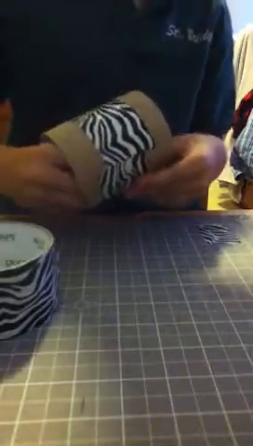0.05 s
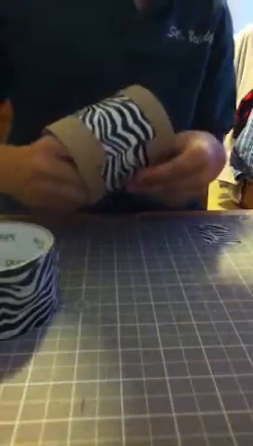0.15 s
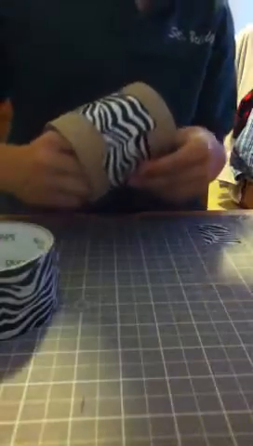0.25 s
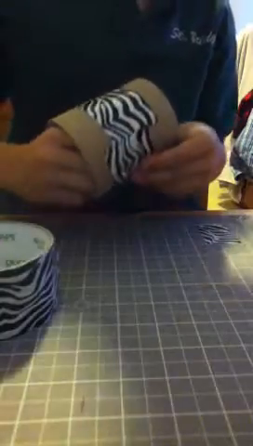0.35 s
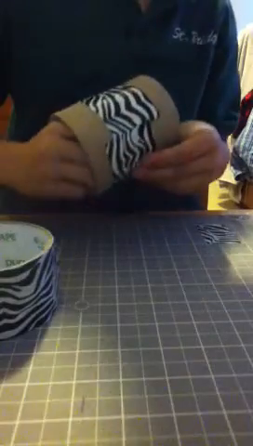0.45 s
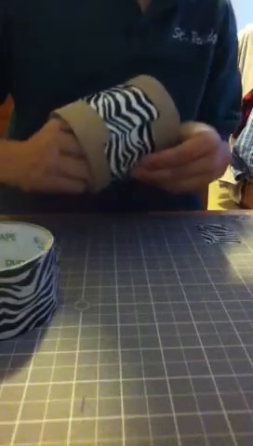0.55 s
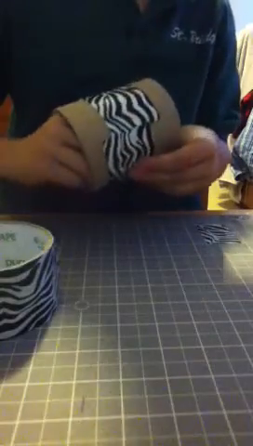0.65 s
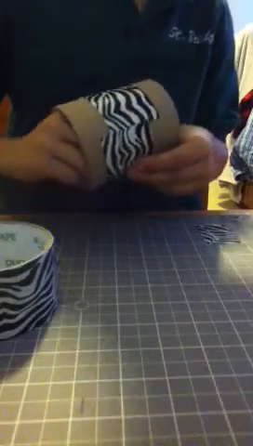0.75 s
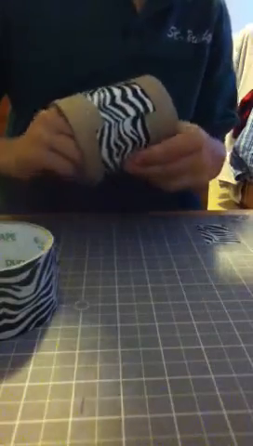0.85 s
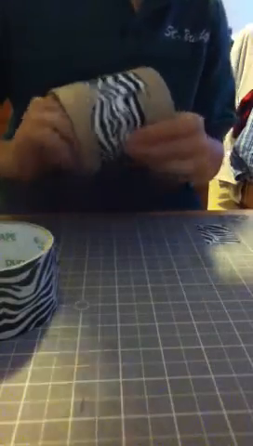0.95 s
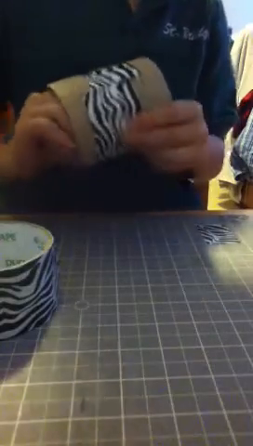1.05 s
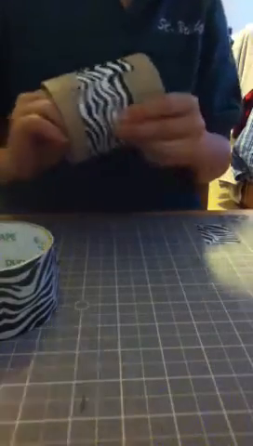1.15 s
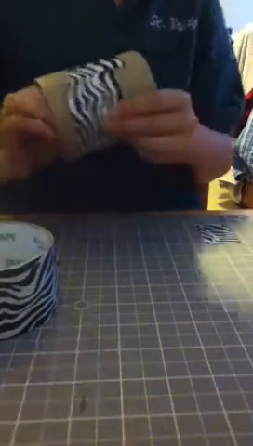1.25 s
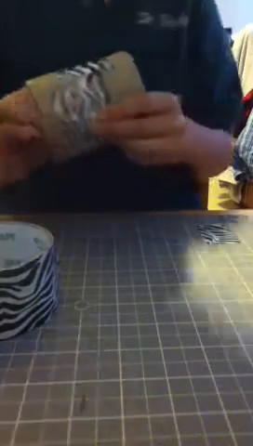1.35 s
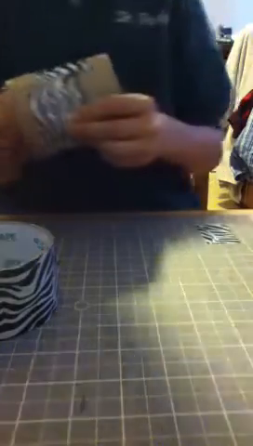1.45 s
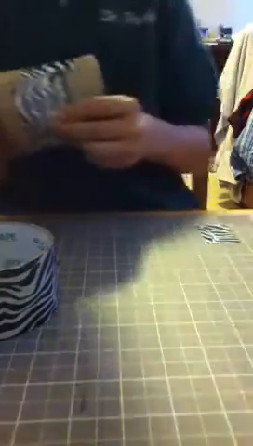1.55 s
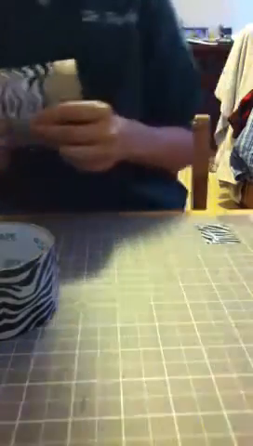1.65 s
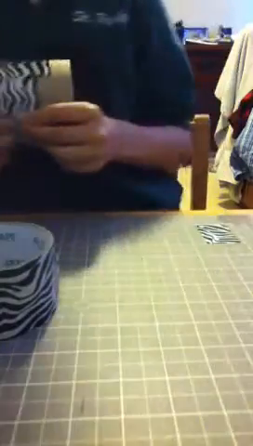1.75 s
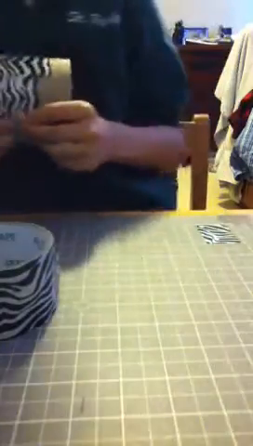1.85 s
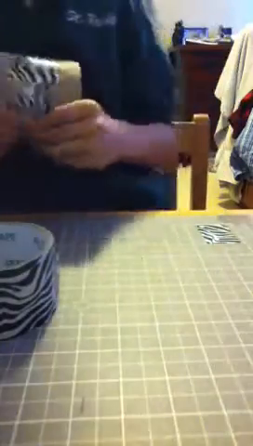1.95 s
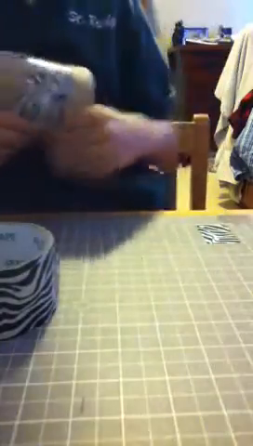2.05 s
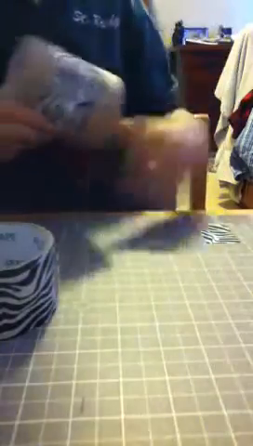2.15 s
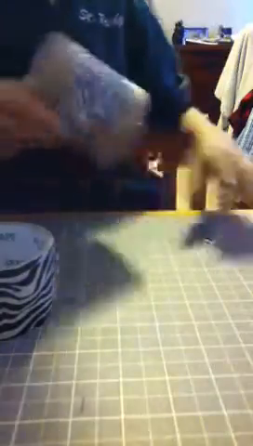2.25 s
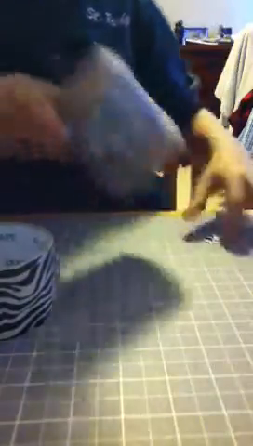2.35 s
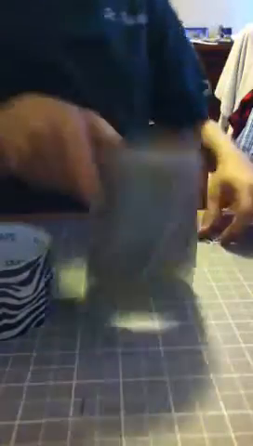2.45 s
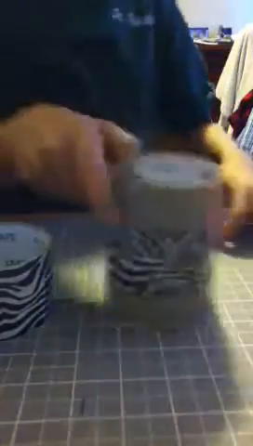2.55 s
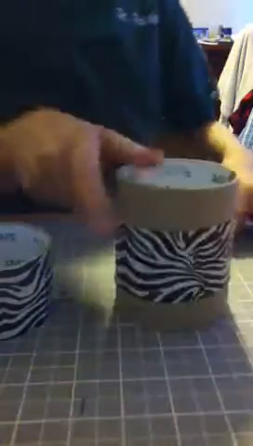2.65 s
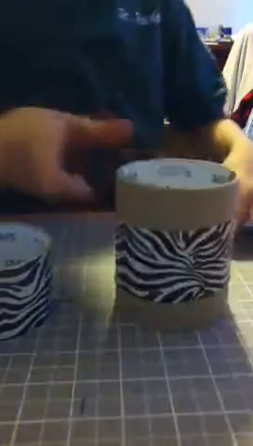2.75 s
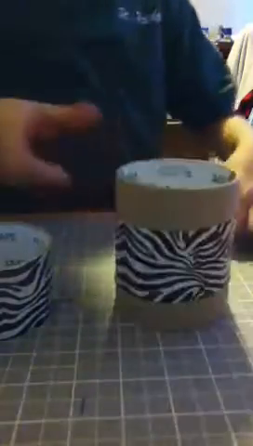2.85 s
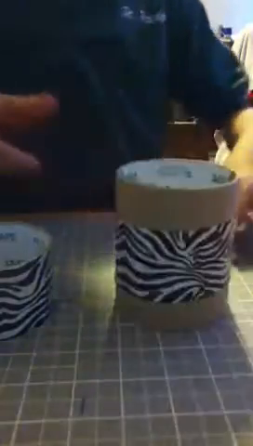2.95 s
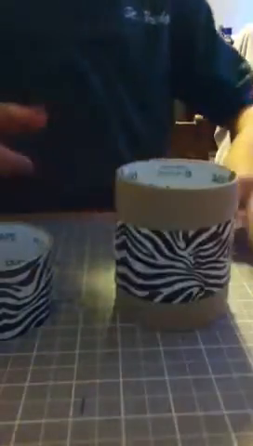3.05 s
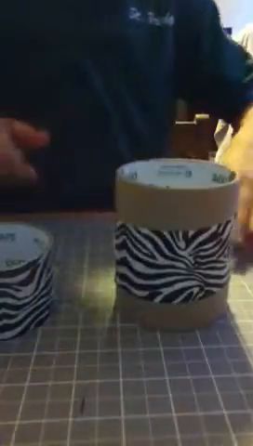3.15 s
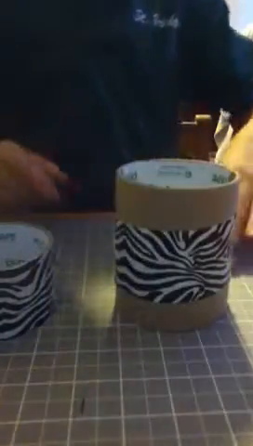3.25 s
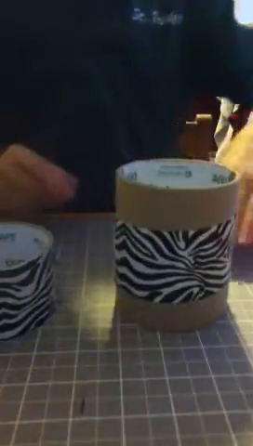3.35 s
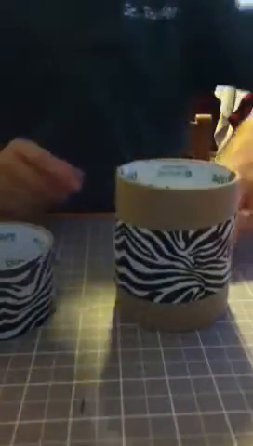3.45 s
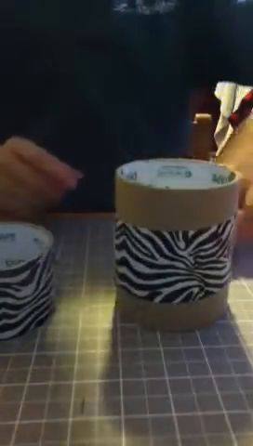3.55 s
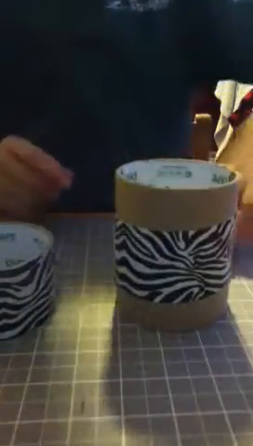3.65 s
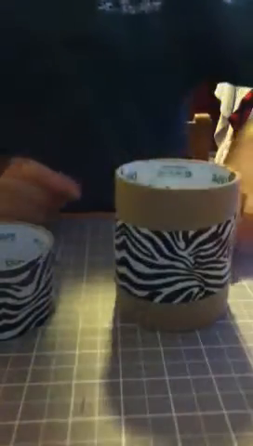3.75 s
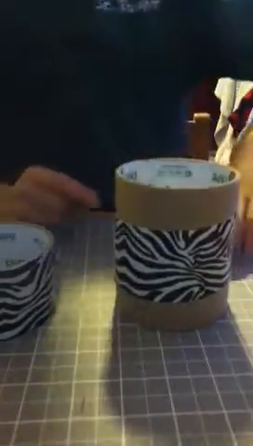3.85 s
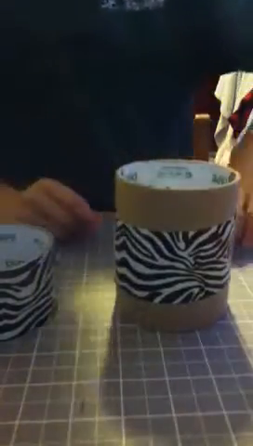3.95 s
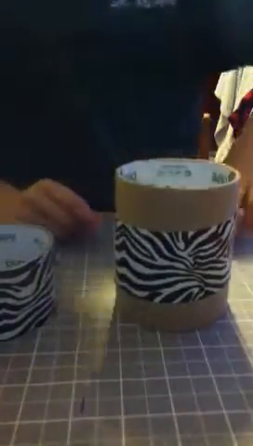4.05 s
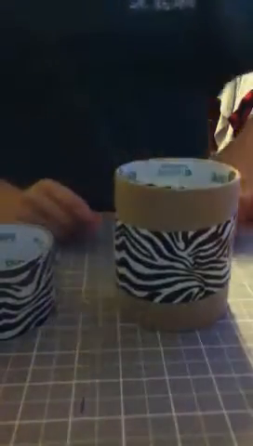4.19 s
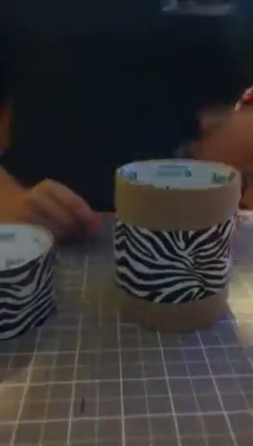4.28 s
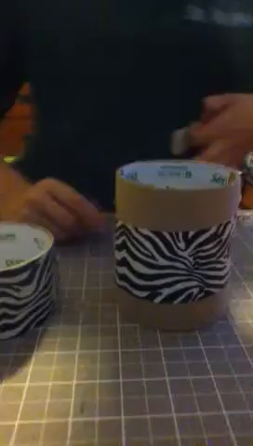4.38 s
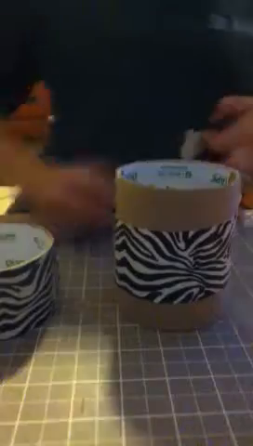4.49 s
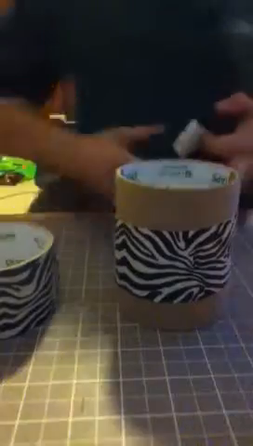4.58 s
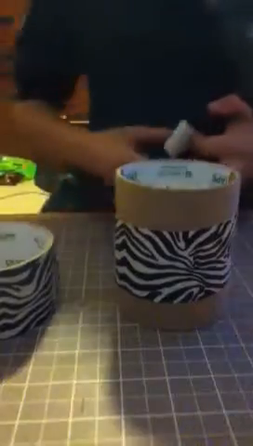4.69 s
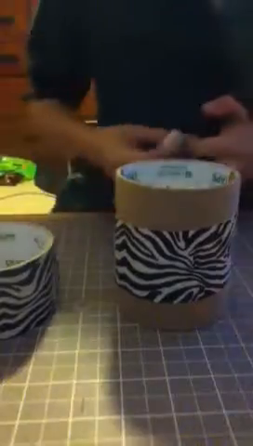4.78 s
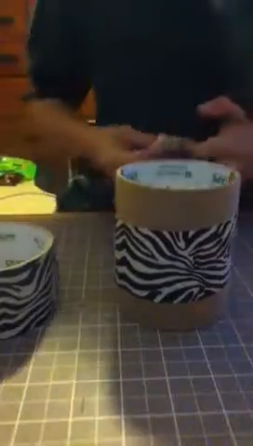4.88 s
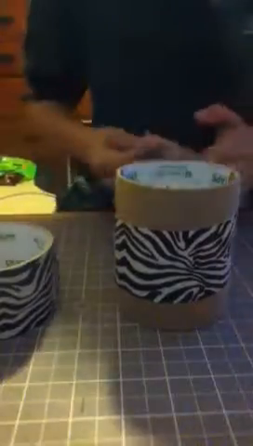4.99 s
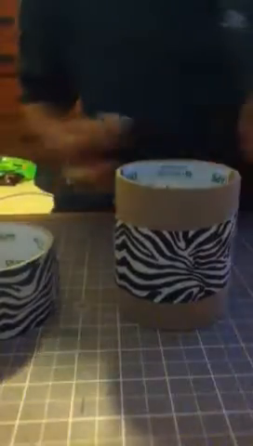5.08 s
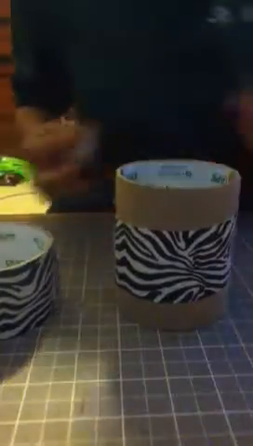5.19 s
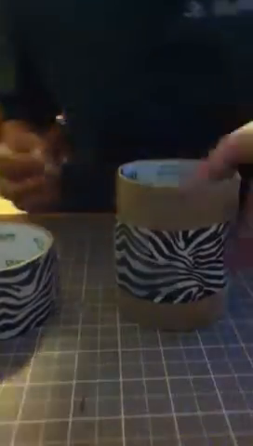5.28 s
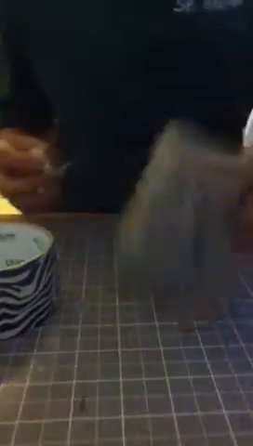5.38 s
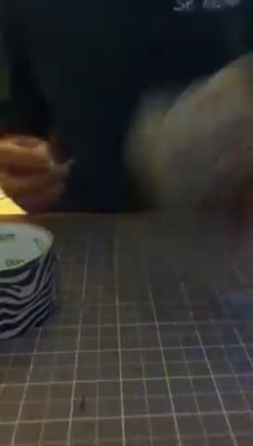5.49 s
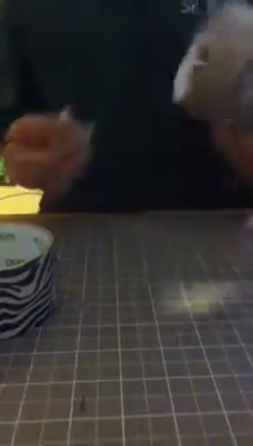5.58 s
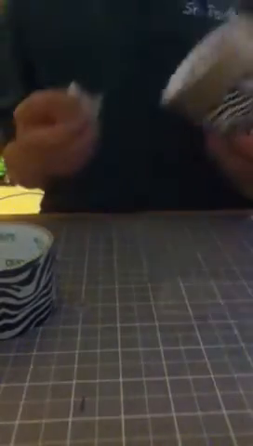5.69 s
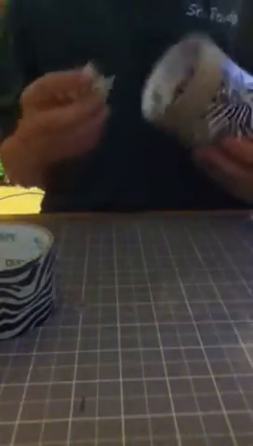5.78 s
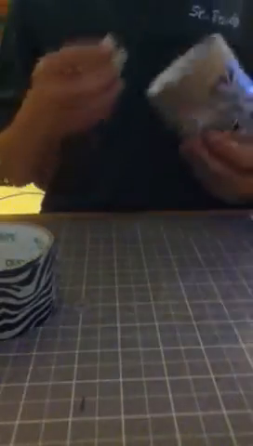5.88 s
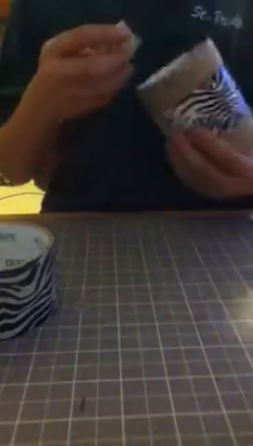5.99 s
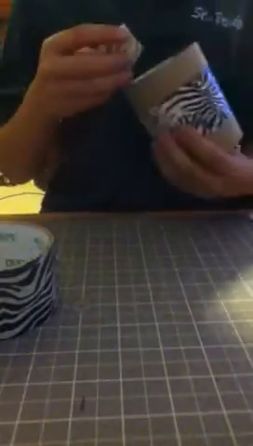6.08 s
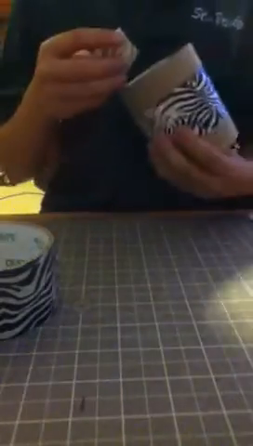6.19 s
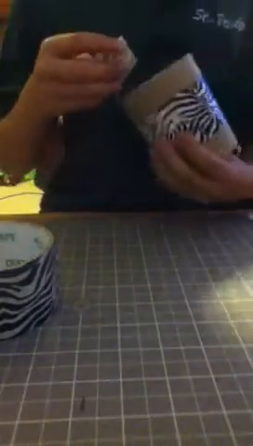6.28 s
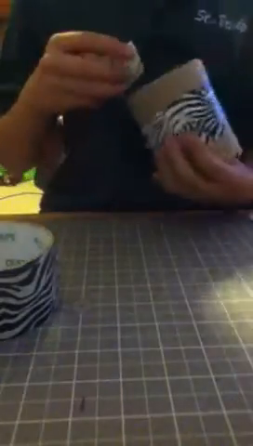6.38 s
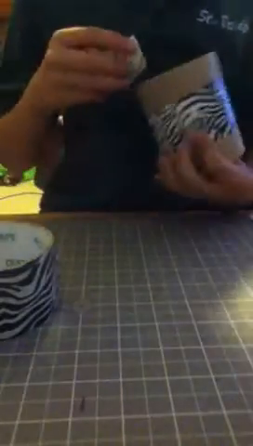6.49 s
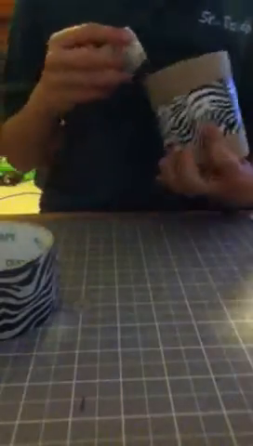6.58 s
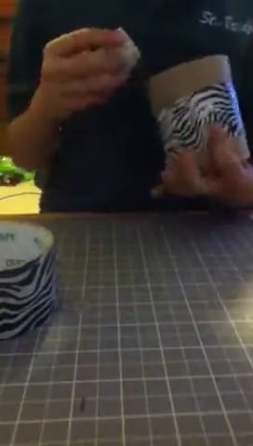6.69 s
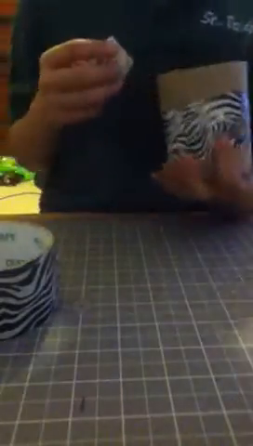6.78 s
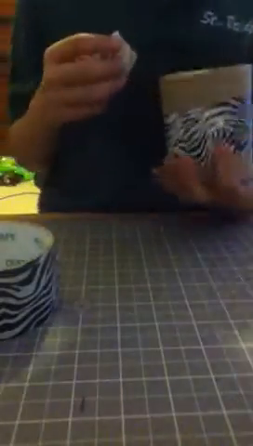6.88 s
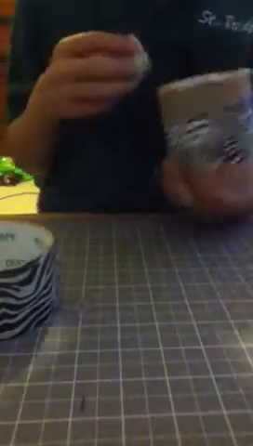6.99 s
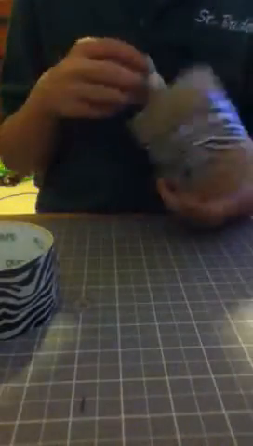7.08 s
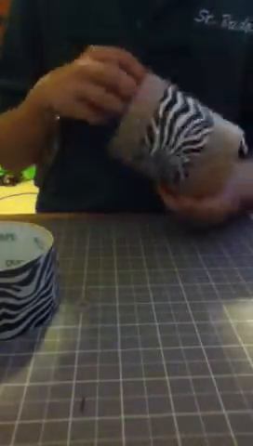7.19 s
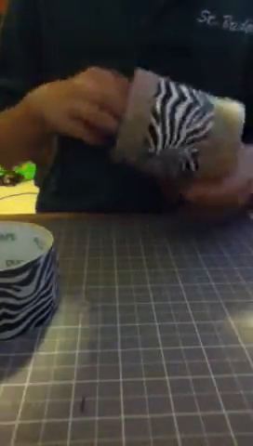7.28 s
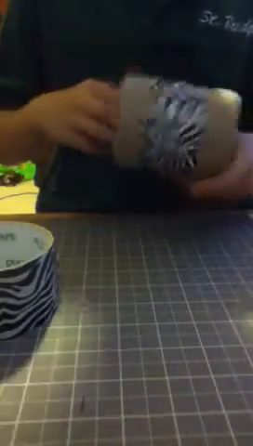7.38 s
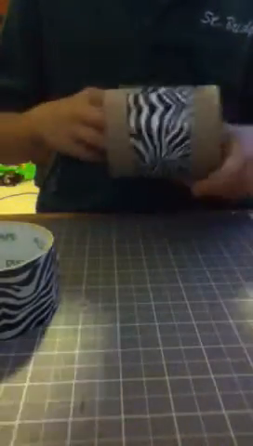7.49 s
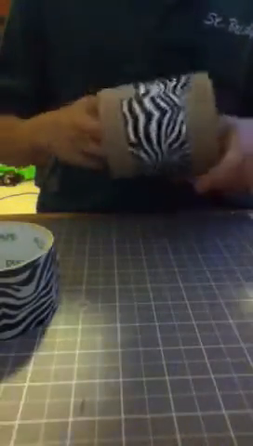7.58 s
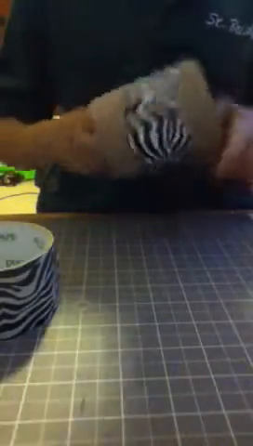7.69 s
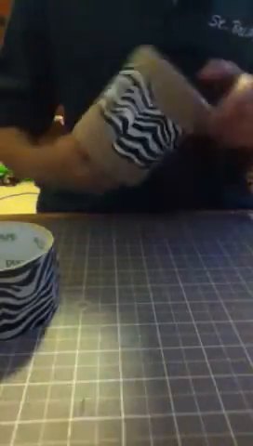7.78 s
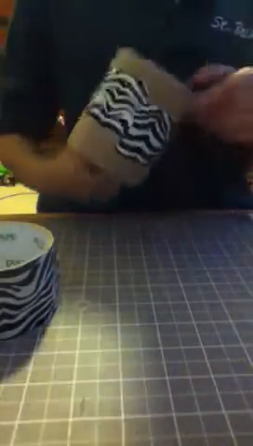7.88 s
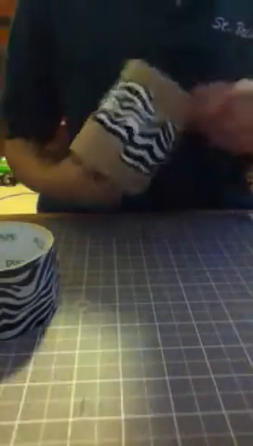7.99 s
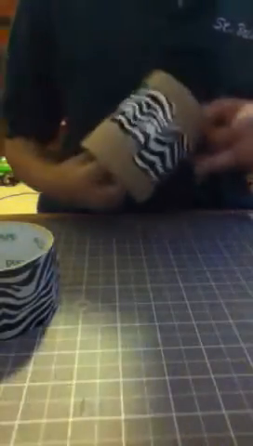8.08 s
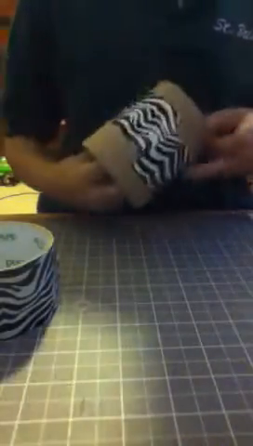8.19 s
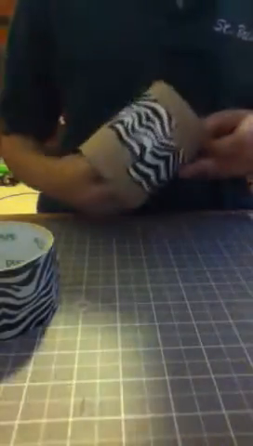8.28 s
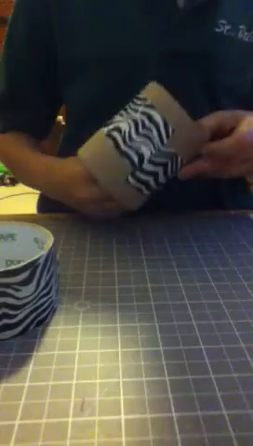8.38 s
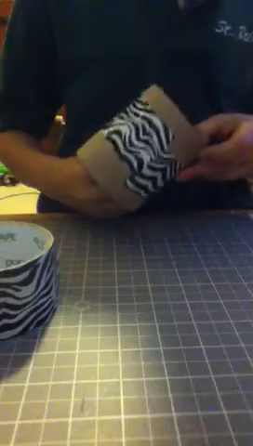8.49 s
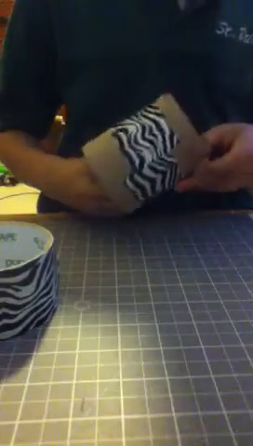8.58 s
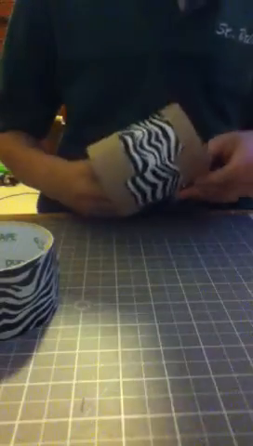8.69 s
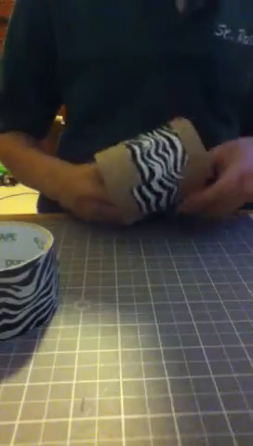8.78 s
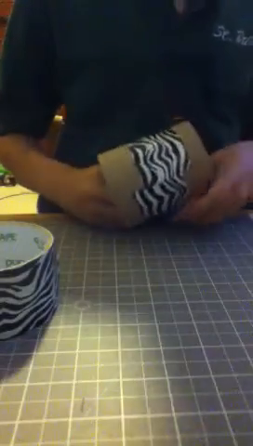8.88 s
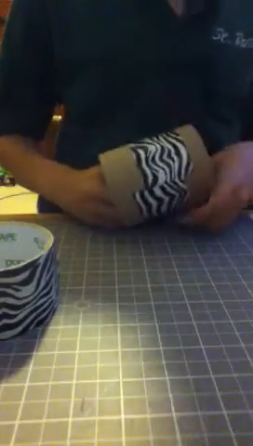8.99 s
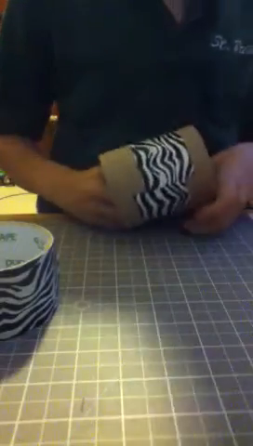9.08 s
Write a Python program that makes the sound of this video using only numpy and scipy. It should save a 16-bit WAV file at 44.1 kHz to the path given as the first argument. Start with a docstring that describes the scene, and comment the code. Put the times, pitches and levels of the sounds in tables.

```python
"""A fan hums in a small room, with a faint electrical whine. Hands turn a cardboard tape core, skin hissing
over the card. At 2.6 s it lands on a cutting mat with a knock that rings core and table, then skids and
rocks to rest. Hands thump the table; just after 4 s a scrap of tape peels off its edge in tiny adhesive
slips and rips free. The core is picked up and rubbed again, with one faint squeak and a few soft bumps."""
import sys
import numpy as np
from scipy import signal
from scipy.fft import rfft, irfft
from scipy.io import wavfile

SR = 44100
rng = np.random.default_rng(int(sys.argv[2]) if len(sys.argv) > 2 else 0)


def transcribe(u):
    """Save the signal u as a 16-bit wav file named by the first command-line argument.

    u: samples, shape (n,) or (channels, n), limited to [-1, 1]; the rate is SR.
    q: integer samples, one column per channel.
    """
    v = np.clip(np.atleast_2d(u).T, -1, 1)
    q = np.round(v * 32767).astype(np.int16)
    wavfile.write(sys.argv[1], SR, q)


N = 403118
TIME = np.arange(N) / SR

# tone colour of the tape: f/Hz, level/dB
TAPE_COLOUR = [(100, 10), (450, 9), (720, 11.5), (1200, 3), (2600, -0.5), (3900, -2), (4600, -4.5),
               (7600, -5.5), (9000, 0), (16000, -6.5)]
# papery resonances of the taut strip: f/Hz, width/Hz, level/dB
STRIP_PEAKS = [(1480, 370, -6), (2100, 130, 4), (3100, 520, 2), (5100, 800, 4), (6520, 370, 2)]
# tone colour of skin pressed on card: f/Hz, level/dB
RASP_COLOUR = [(300, -9.5), (900, 3), (1500, -3), (2300, -2), (3600, -3.5), (5000, -4.5), (8000, -24),
               (16000, -24)]


def amp(db):
    """Decibels to gain."""
    return 10 ** (np.asarray(db) / 20)


def unit(x):
    """Scales to rms 1."""
    return x / np.sqrt(np.mean(x ** 2) + 1e-20)


def read(points, hz):
    """Reads a curve on a log-frequency axis."""
    f, value = np.transpose(points)
    return np.interp(np.log(hz + 1), np.log(f + 1), value)


def add(mix, s, sound):
    """Lays a sound into the mix at time s."""
    part = mix[max(round(s * SR), 0):][:len(sound)]
    part += sound[:len(part)]


def gate(t, length, attack_s, release_s):
    """Smooth attack, hold and release within a length."""
    ramp = np.minimum(t / attack_s, (length - t) / release_s)
    return np.sin(np.pi / 2 * np.clip(ramp, 0, 1)) ** 2


def colour(x, points, centre_hz=1000, focus_db=0, depth_db=16, size=2048):
    """Minimum-phase EQ: a curve, cut by focus_db per octave squared off centre, depth_db at most."""
    hz = abs(np.fft.fftfreq(size, 1 / SR))
    octaves = np.log2((hz + 1) / centre_hz)
    db = read(points, hz) - depth_db * np.tanh(focus_db * octaves ** 2 / depth_db)
    response = np.exp(np.conj(signal.hilbert(np.log(amp(db)))))
    taps = np.fft.ifft(response).real
    return signal.fftconvolve(x, taps[:size // 2])[:N]


def resonate(x, peaks):
    """Adds the ringing of a few resonances to a sound."""
    return x + sum(amp(db) * signal.lfilter(*signal.iirpeak(hz, hz / width, SR), x)
                   for hz, width, db in peaks)


def ring(modes, t):
    """Free decay of a struck body."""
    return sum(amp(db - 60 * t / t60) * np.sin(2 * np.pi * hz * t) for hz, db, t60 in modes)


def drift(rate_hz):
    """Slow random wandering of rms 1."""
    hz = np.fft.rfftfreq(N, 1 / SR)
    return unit(irfft(rfft(rng.standard_normal(N)) * np.exp(-(hz / rate_hz) ** 2), N))


def grains(count, per_s, spread_db, smooth):
    """Tiny slips of uneven size over a smooth friction noise."""
    size = amp(spread_db * np.minimum(rng.exponential(1, count), 4))
    slips = size * rng.choice([-1, 1], count) * (rng.random(count) < per_s / SR)
    return unit(unit(slips) + smooth * rng.standard_normal(count))


def burst(t, decay_s):
    """A dying spray of micro-impacts with an even spectrum, of energy 1."""
    fade = np.exp(-t / decay_s)
    phase = np.angle(rfft(rng.standard_normal(len(t)) * fade))
    spray = irfft(np.exp(1j * phase), len(t)) * fade ** .25
    return spray / np.linalg.norm(spray)


def room(x, delay_s=.007, reflections_per_s=3000):
    """Scattered reflections of a small furnished room, each band dying at its own speed."""
    # reverb time: f/Hz, t60/s
    decay_times = [(100, 0.23), (300, 0.26), (1000, 0.26), (3000, 0.17), (8000, 0.22), (15000, 0.2)]
    count = SR // 2
    taps = rng.choice([-1., 1.], count) * (rng.random(count) < reflections_per_s / SR)
    hz, t, bands = signal.stft(taps, SR, nperseg=256)
    fade = amp(-60 * t / read(decay_times, hz)[:, None])
    tail = signal.istft(bands * fade, SR, nperseg=256)[1]
    tail = np.r_[np.zeros(int(delay_s * SR)), tail / np.linalg.norm(tail)]
    return signal.fftconvolve(x, tail)[:N]


def fan(hum_hz=233.6, waver_hz=15, hum_db=-56.5):
    """A bed of rushing air with a narrow, wavering hum."""
    # fan air and steady hiss: f/Hz, level/dB in a 1 Hz band
    air_colour = [(20, -108), (50, -90.5), (100, -82.5), (200, -76.5), (305, -75), (390, -80), (430, -85),
                  (600, -93), (850, -95), (1120, -92.5), (1450, -99), (4000, -104), (9500, -105),
                  (15800, -113)]
    hz = np.fft.rfftfreq(N, 1 / SR)
    air = irfft(rfft(rng.standard_normal(N)) * amp(read(air_colour, hz)), N) * np.sqrt(SR / 2)
    phase = 2 * np.pi * hum_hz * TIME
    hum = unit(drift(waver_hz) * np.cos(phase) + drift(waver_hz) * np.sin(phase))
    return air + amp(hum_db) * hum


def whine(pulses_per_s=7.8, idle_db=-17, spread_db=9, waver=0.00385, whistle_hz=14992, whistle_db=-88):
    """Faint electrical tones pulse evenly with random strength, beside a thin steady whistle."""
    # tones of the whine: f/Hz, level/dB
    partials = [(2078, -65.5), (2342, -71.5), (2870, -77)]
    cycle = TIME * pulses_per_s
    strength = amp(-spread_db * rng.exponential(1, SR))[cycle.astype(int)]
    pulsing = amp(idle_db) + strength * np.sin(np.pi * cycle) ** 2
    clock = TIME + waver * np.cumsum(drift(rate_hz=52)) / SR
    tones = sum(amp(db) * np.sin(2 * np.pi * hz * clock) for hz, db in partials)
    whistle = unit(np.sin(2 * np.pi * whistle_hz * TIME))
    return pulsing * tones + amp(whistle_db) * whistle


def squeak(start_s=6.92, length_s=0.081, level_db=-67, jitter=.028, edge_s=0.026):
    """A fingertip slips almost regularly on the tape: two unsteady tones."""
    # pitches of the squeak: f/Hz
    pitches = [2950, 5030]
    clock = TIME + jitter * np.cumsum(drift(rate_hz=300)) / SR
    tones = sum(np.sin(2 * np.pi * hz * clock) for hz in pitches)
    return amp(level_db) * gate(TIME - start_s, length_s, edge_s, edge_s) * tones


def creaks(centre_hz=2950, focus_db=13, slip_s=0.0026):
    """Faint creaks: trains of slips slow enough to hear singly, each a tiny puff of rasp."""
    # slip trains: t/s, length/s, level/dB, rate/Hz
    trains = [(3.272, .045, -61, 190), (3.37, 0.085, -64, 93)]
    out = np.zeros(N)
    for s, length, db, per_s in trains:
        t = np.arange(0, length, 1 / SR)
        puffs = np.exp(-(t % (1 / per_s)) / slip_s)
        slips = rng.standard_normal(len(t)) * puffs * signal.windows.tukey(len(t), .5)
        run = colour(slips, RASP_COLOUR, centre_hz, focus_db)
        add(out, s, amp(db) * run * np.sqrt(len(t) / np.sum(run ** 2)))
    return out


def rubbing(rasp_db=-2, catch_db=2.5, uneven_db=1.9, attack_s=0.021, release_s=0.056):
    """Fingers slide over the core: a fine hiss, and a coarser rasp where they press."""
    # strokes of skin over card and tape: t/s, length/s, level/dB, lean towards rasp/dB
    strokes = [(0.55, .24, -63, -4), (0.842, 0.1, -59.5, -4), (1.21, 0.25, -53.5, -3),
               (1.455, 0.22, -53.5, -3), (1.816, 0.47, -58, 5), (2.183, 0.15, -54.5, -9),
               (2.316, 0.35, -64, -3), (3.203, .29, -65, 24), (3.896, .15, -53.5, 8), (4.5, 0.12, -55, 1),
               (4.578, .49, -63, 10), (5.25, 0.26, -62, 5), (5.41, 0.15, -55, 1), (5.683, 0.1, -59, -2),
               (6.123, .07, -60.5, -1), (6.52, 0.082, -59, -7), (6.906, 0.15, -61, 4),
               (7.076, 1.46, -62, -10), (7.176, 0.09, -62.5, -17), (7.659, 0.19, -62.5, -17),
               (7.96, .08, -57.5, -16), (8.87, .21, -59.5, 6)]
    # tone colour of a light stroke: f/Hz, level/dB
    hiss_colour = [(1000, -4), (3000, -6.5), (4400, -1), (7000, 2), (9500, 1.5), (11000, -4.5),
                   (12500, -5.5), (16000, -13)]
    # resonances of the card wall: f/Hz, width/Hz, level/dB
    wall_peaks = [(980, 140, -17), (2950, 97, 0), (6260, 570, -6), (8100, 340, -9), (10400, 880, -8.5)]
    fine = colour(grains(N, per_s=2200, spread_db=3.5, smooth=1.2), hiss_colour)
    coarse = colour(grains(N, per_s=1300, spread_db=6.0, smooth=1.3), RASP_COLOUR)
    hiss, rasp = unit(resonate(fine, wall_peaks)), unit(resonate(coarse, wall_peaks))
    # skin catches and lets go quickly; the hand's speed wanders slowly
    catch = unit(amp(catch_db * drift(rate_hz=43) + uneven_db * drift(rate_hz=8.2)))
    light, pressed = np.zeros(N), np.zeros(N)
    for s, length, db, press_db in strokes:
        t = np.arange(0, length, 1 / SR)
        stroke = amp(db) * gate(t, length, attack_s, release_s) / np.hypot(1, amp(press_db))
        add(light, s, stroke)
        add(pressed, s, stroke * amp(press_db))
    return catch * (light * hiss + amp(rasp_db) * pressed * rasp)


def ticks(decay_s=0.0023, lag_s=.0007, strip_share=0.078, focus_db=4, depth_db=22):
    """Dry snaps of fingernails and of tape letting go, each lightly ringing the strip."""
    # snaps: t/s, peak level/dB, centre f/Hz
    snaps = [(.875, -35, 6200), (1.230, -34, 4770), (1.330, -32.5, 4230), (1.354, -29, 4800),
             (2.160, -40, 4200), (2.365, -39, 7000), (2.470, -38, 3170), (2.962, -25.5, 4870),
             (3.925, -32, 1920), (4.035, -30.5, 2900), (4.0424, -30, 3300), (4.0538, -27.5, 4500),
             (4.073, -23.5, 3700), (4.091, -28, 3520), (4.099, -29, 3000), (4.215, -31, 1910),
             (4.264, -29.5, 2290), (5.073, -33, 4300), (5.114, -38, 3500), (5.1354, -27, 3120),
             (5.421, -33, 4600), (5.443, -31.5, 9000), (7.288, -43, 6800), (7.729, -35.5, 5200),
             (7.793, -43, 6800)]
    out, t = np.zeros(N), np.arange(SR // 50) / SR
    for s, db, hz in snaps:
        snap = colour(burst(t, decay_s), TAPE_COLOUR, hz, focus_db, depth_db)
        snap = snap + strip_share * resonate(snap, STRIP_PEAKS)
        add(out, s + lag_s, amp(db) * snap / abs(snap).max())
    return out


def ping(start_s=2.9627, centre_hz=12150, width_hz=1700, peak_db=-26, decay_s=0.0013):
    """A brief, very high ring on the tick after the landing."""
    out, t = np.zeros(N), np.arange(SR // 50) / SR
    edges_hz = [centre_hz - width_hz / 2, centre_hz + width_hz / 2]
    band = signal.butter(2, edges_hz, "band", fs=SR, output="sos")
    snap = signal.sosfilt(band, burst(t, decay_s))
    add(out, start_s, amp(peak_db) * snap / abs(snap).max())
    return out


def peels(focus_db=3.1):
    """The adhesive lets go in dense slips that shake the strip of tape."""
    # stick-slip runs as tape peels or drags: t/s, length/s, level/dB, centre f/Hz
    pulls = [(4.053, .13, -51, 2940), (4.207, 0.15, -49, 1880), (5.069, 0.019, -49, 4180),
             (5.427, 0.014, -50, 9000), (6.734, .013, -55, 3520), (8.246, .024, -59.5, 2500)]
    out = np.zeros(N)
    for s, length, db, hz in pulls:
        count = int(length * SR)
        slips = grains(count, per_s=1800, spread_db=4.5, smooth=0.73) * signal.windows.tukey(count, .6)
        run = resonate(colour(slips, TAPE_COLOUR, hz, focus_db), STRIP_PEAKS)
        add(out, s, amp(db) * run * np.sqrt(count / np.sum(run ** 2)))
    return out


def rip(start_s=4.338, length_s=0.034, level_db=-27.3, swell_db=4,
        from_hz=2750, to_hz=4400, focus_db=5.5):
    """The last of the strip tears loose, growing louder and brighter as it speeds up."""
    out, count = np.zeros(N), int(length_s * SR)
    t = np.arange(count) / SR
    speed = t / length_s
    envelope = gate(t, length_s, attack_s=0.0043, release_s=0.0077) * amp(swell_db * speed)
    slips = grains(count, per_s=3900, spread_db=4.5, smooth=1.2) * envelope
    dull = colour(slips * (1 - speed), TAPE_COLOUR, from_hz, focus_db)
    bright = colour(slips * speed, TAPE_COLOUR, to_hz, focus_db)
    run = resonate(dull + bright, STRIP_PEAKS)
    add(out, start_s, amp(level_db) * run * np.sqrt(count / np.sum(run ** 2)))
    return out


def skid(start_s=2.616, length_s=0.15, level_db=-38.5, fade_db_per_s=85):
    """The rim slides grittily over the mat, slowing from the landing until the core settles."""
    # tone colour of card on the mat: f/Hz, level/dB
    grit_colour = [(200, -15), (1000, 7.5), (2200, 2), (4000, -6.5), (6500, -5), (8200, -2), (8900, -5),
                   (9800, 3), (10800, -7.5), (16000, -22)]
    t = np.maximum(TIME - start_s, 0)
    envelope = gate(t, length_s, attack_s=0.007, release_s=0.048) * amp(level_db - fade_db_per_s * t)
    grit = colour(grains(N, per_s=1500, spread_db=2.0, smooth=1.0), grit_colour)
    return envelope * unit(grit)


def knocks(ring_below_ms=0.61, crack_db=-2, crack_s=0.0041, radiate_hz=125, lag_s=0.00083,
           sway_above_ms=4.2, sway_db=6.5, least_sway_db=-29):
    """Hard blows ring the core and the board; soft ones lose their treble and sway the table instead."""
    # blows on the table, short from the core's rim, long from a hand: t/s, force/dB, contact/ms
    blows = [(2.4697, -13.5, 1.2), (2.557, -41, .13), (2.616, -3, 0.03), (2.638, -22, 0.052),
             (2.6874, -5.5, 1), (2.6925, -6.5, 0.33), (2.7196, -14.5, 0.24), (2.735, -25, 0.31),
             (3.429, -17, 3), (3.914, 0, 3.3), (3.926, -24.5, 0.27), (3.93, -2.5, 1.74), (3.949, -27, .45),
             (3.975, -5, 3.2), (5.402, -11.5, 1.5), (6.242, -12, 4.7), (8.661, -10, 7.7), (8.968, -12, 1.5)]
    # modes of the table board under its mat: f/Hz, level/dB, t60/s
    board_modes = [(154, -16.5, .085), (220.6, -25, 0.21), (247, -12.5, 0.026), (287.7, -18.5, 0.2),
                   (381.4, -17.5, 0.092), (532, -26, 0.061)]
    # modes of the cardboard ring: f/Hz, level/dB, t60/s
    core_modes = [(698, -17, 0.089), (710, -31, .18), (826, -17, .06), (885, -4.5, 0.037),
                  (1020, -14, 0.04), (1186, -16.5, 0.049), (1440, -17.5, 0.065), (1895, -27, 0.047),
                  (2120, -20, 0.038), (3120, -23, .02), (3620, -21, .017)]
    # the whole table swaying on its legs: f/Hz, level/dB, t60/s
    frame_modes = [(54, -32.5, 0.27), (75, -37, .2), (108, -55, 0.2)]
    # tone colour of the rim meeting the mat: f/Hz, level/dB
    crack_colour = [(300, -19), (900, 11), (1400, 17), (2000, 17.5), (2600, 15), (3150, 13.5), (3700, 10),
                    (4600, -4), (8000, 7), (11000, -1), (16000, -27)]
    out, t = np.zeros(N), np.arange(SR // 2) / SR
    board = -ring(board_modes, np.maximum(t - lag_s, 0))
    core, frame = ring(core_modes, t), -ring(frame_modes, t)
    radiation = signal.butter(2, radiate_hz, "high", fs=SR, output="sos")  # slow motion moves little air
    for s, force_db, contact_ms in blows:
        contact_age = t / (contact_ms / 1000)
        push = contact_age * np.exp(-contact_age)
        hardness = 1 / np.hypot(1, (contact_ms / ring_below_ms) ** 2)
        sway = amp(least_sway_db) + amp(sway_db) / (1 + (sway_above_ms / contact_ms) ** 2)
        crack = colour(burst(t, crack_s), crack_colour)[:len(t)]
        strike = board + hardness * (core + amp(crack_db) * crack)
        body = signal.sosfilt(radiation, strike) + sway * frame
        add(out, s, amp(force_db) * signal.fftconvolve(body, push / push.sum()))
    return out


def scene(near_room_db=-14, far_room_db=-9):
    """Mono mix: the core lands up close; the hands work farther back, with more room."""
    near = knocks() + skid() + ping()
    far = ticks() + peels() + rip() + rubbing() + creaks() + squeak()
    reverb = room(amp(near_room_db) * near + amp(far_room_db) * far)
    return (near + far + reverb + fan() + whine())[None]


def record(dry, cutoff_hz=15830):
    """A steep low-pass trims the very top of the treble."""
    lowpass = signal.firwin(1023, cutoff_hz, window=("kaiser", 9), fs=SR)
    return signal.oaconvolve(dry, lowpass[None], "same")


dry = scene()
out = record(dry)
transcribe(out)
```